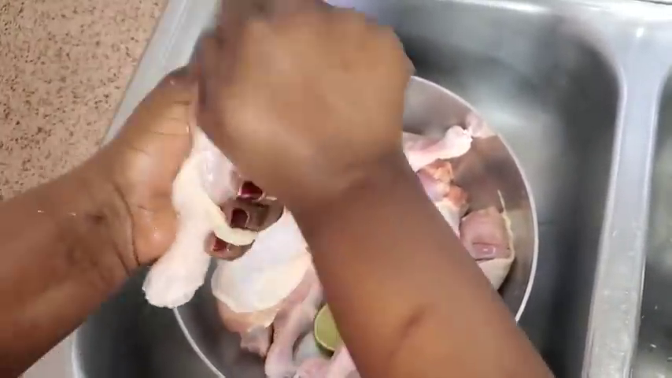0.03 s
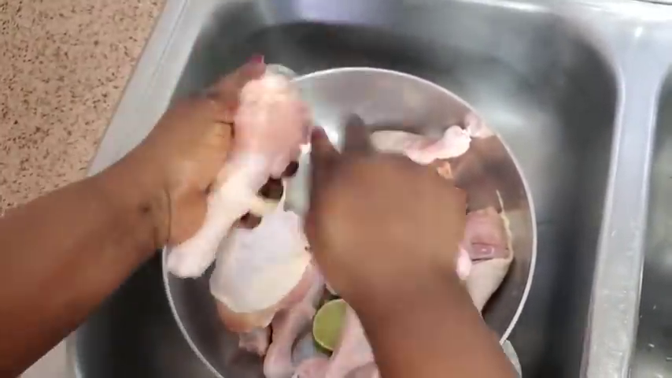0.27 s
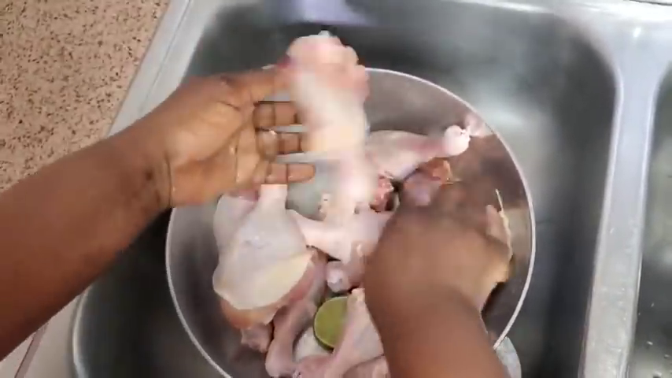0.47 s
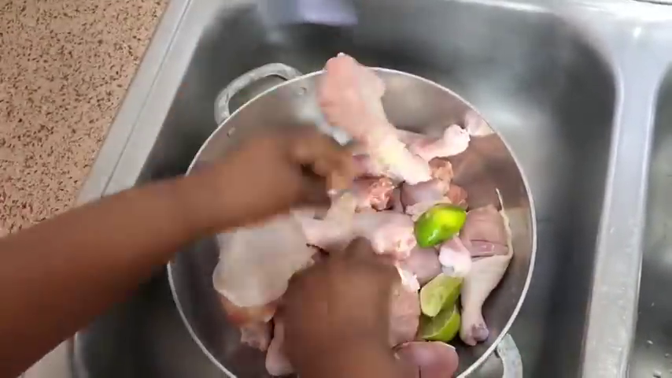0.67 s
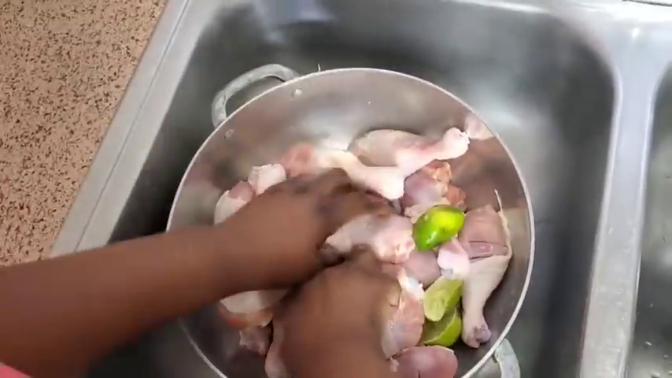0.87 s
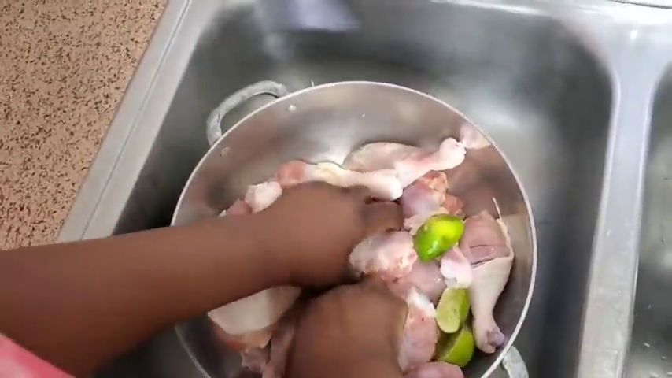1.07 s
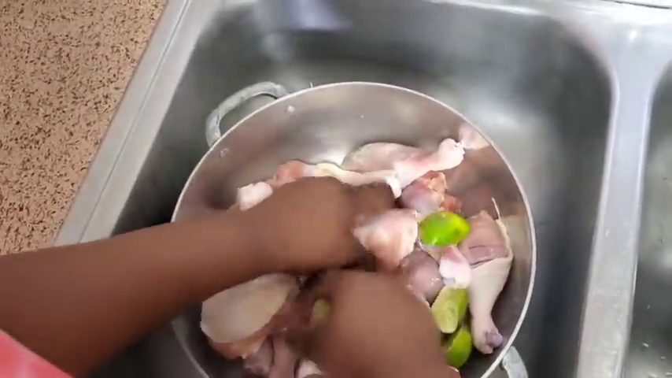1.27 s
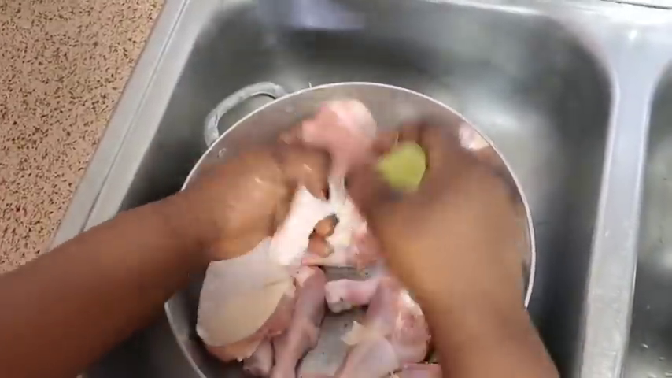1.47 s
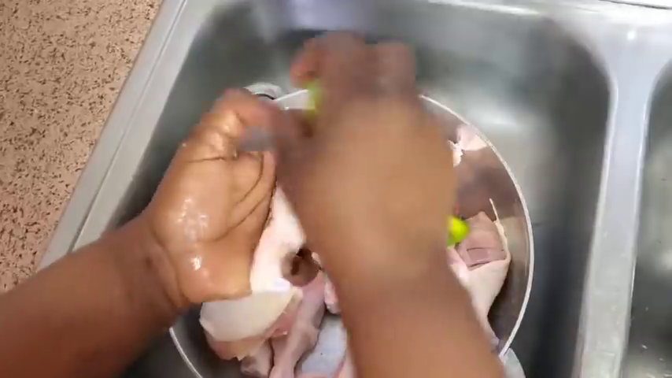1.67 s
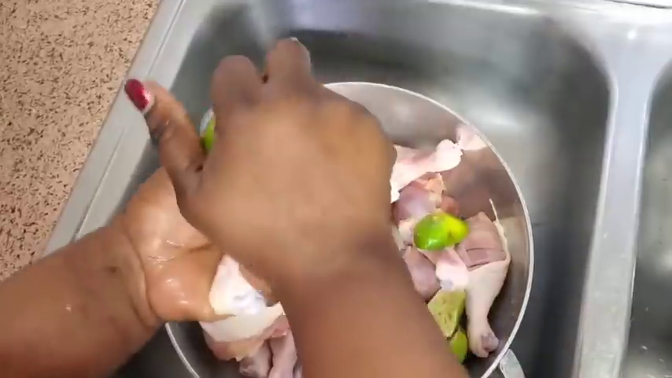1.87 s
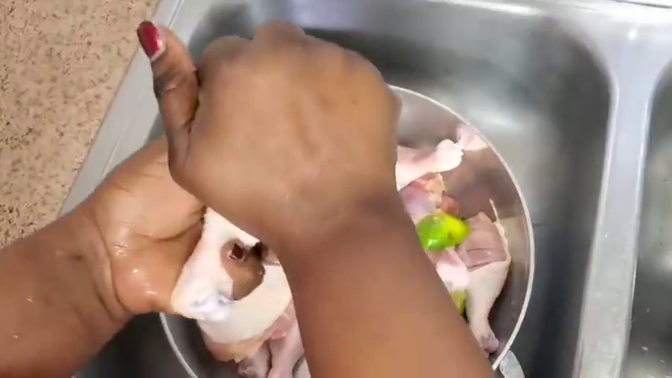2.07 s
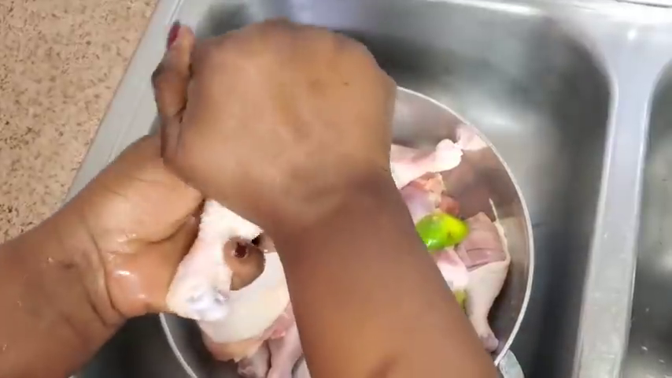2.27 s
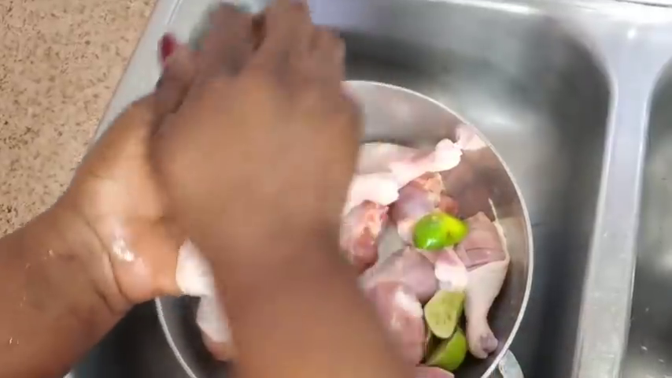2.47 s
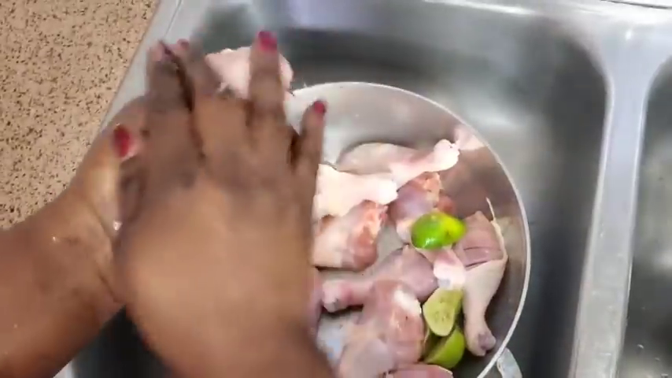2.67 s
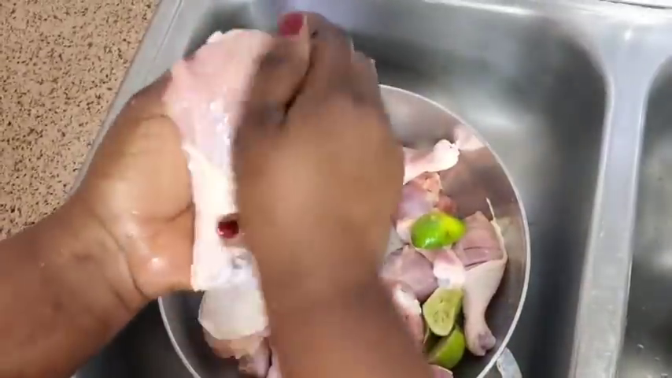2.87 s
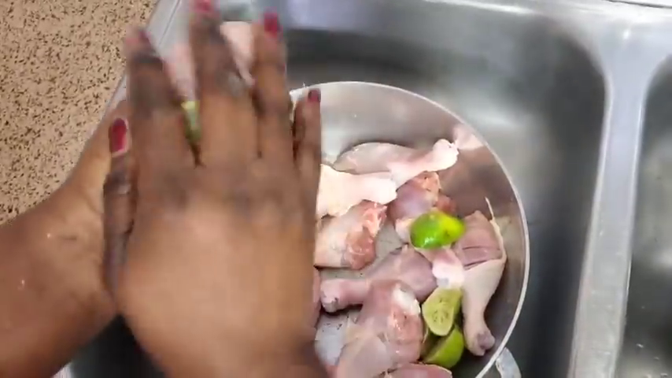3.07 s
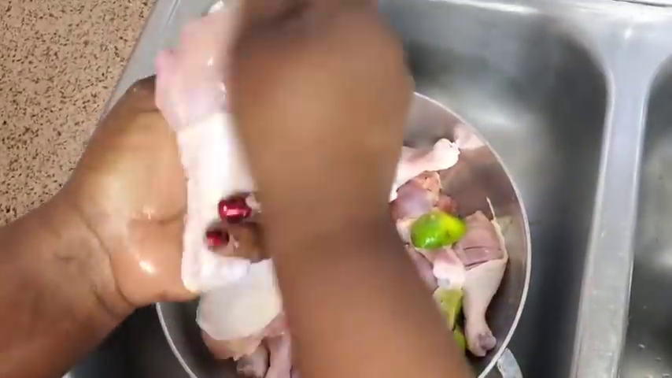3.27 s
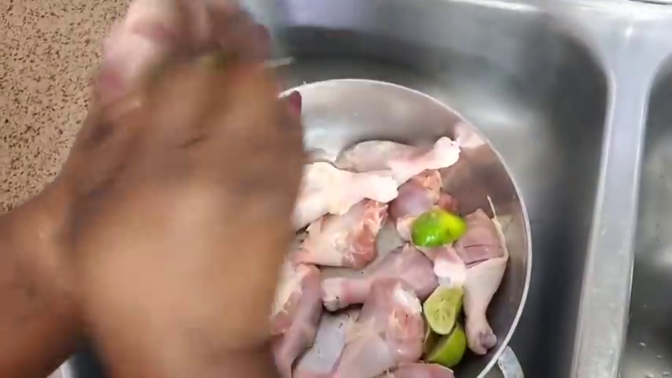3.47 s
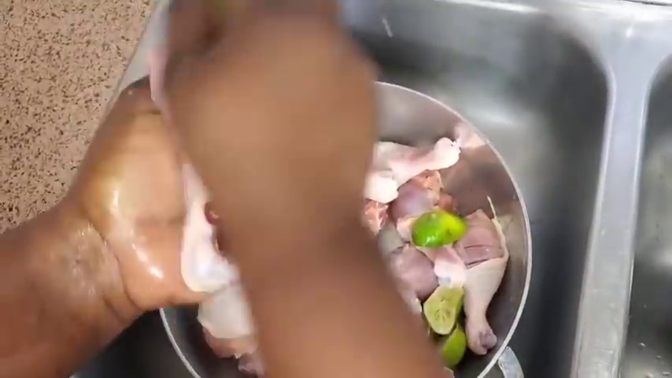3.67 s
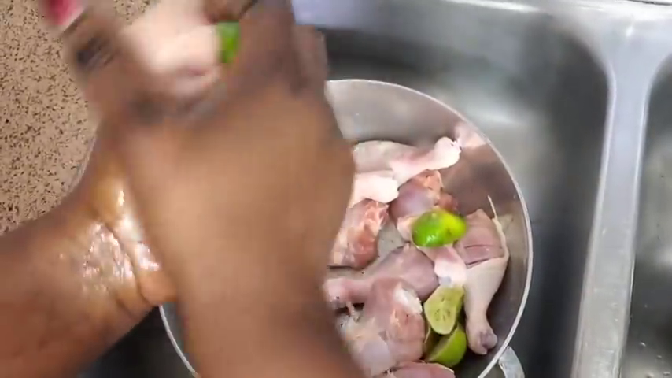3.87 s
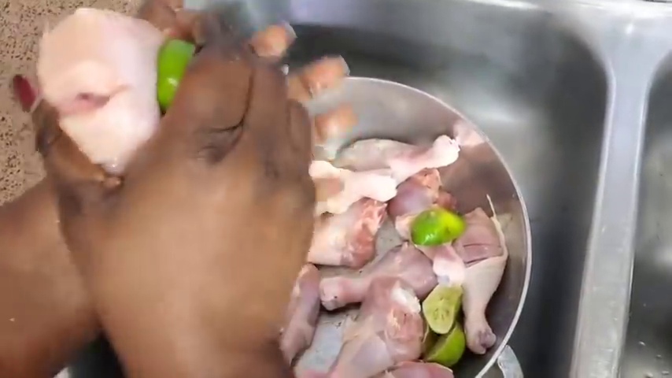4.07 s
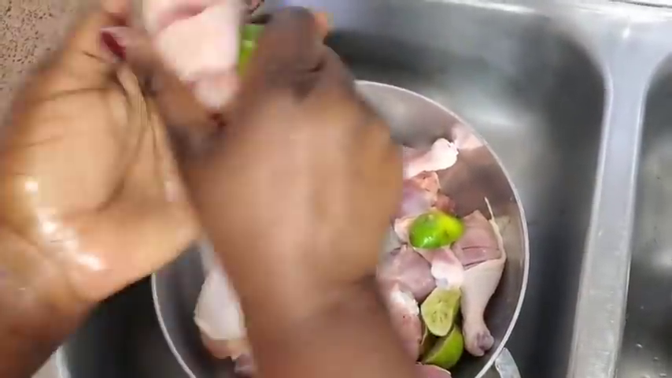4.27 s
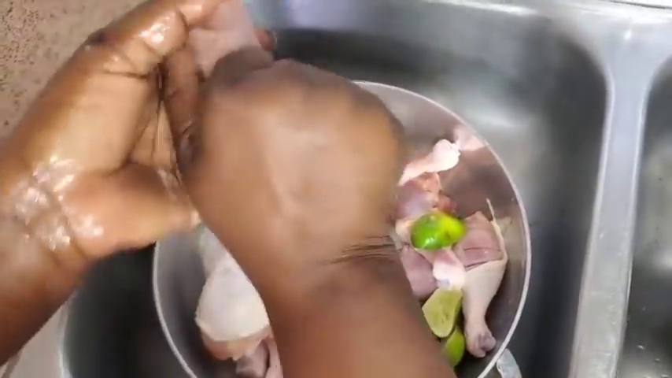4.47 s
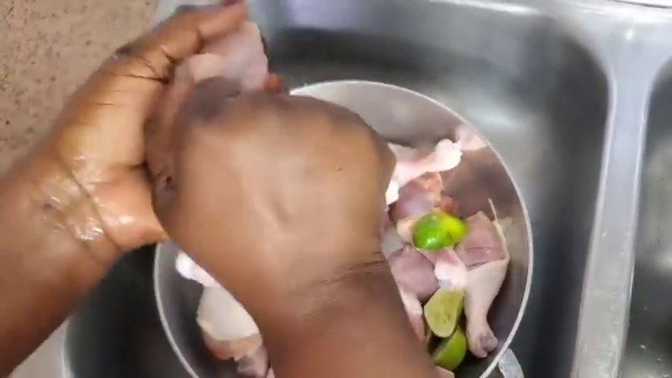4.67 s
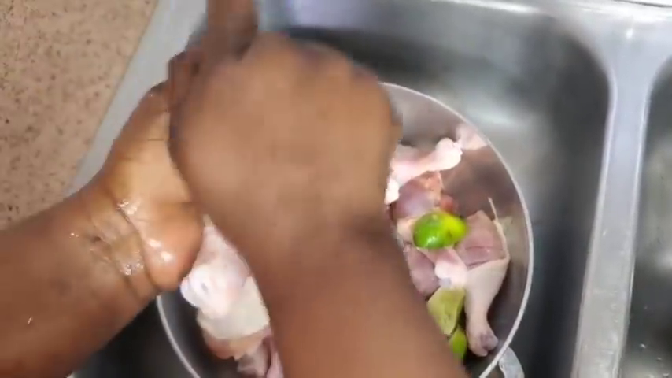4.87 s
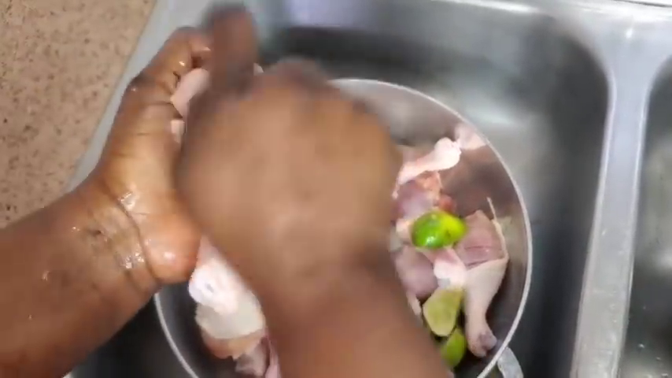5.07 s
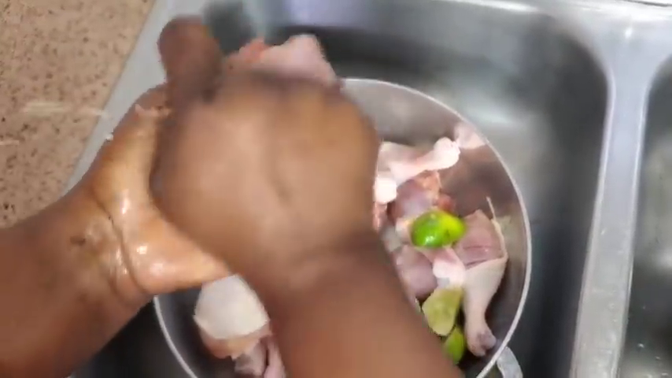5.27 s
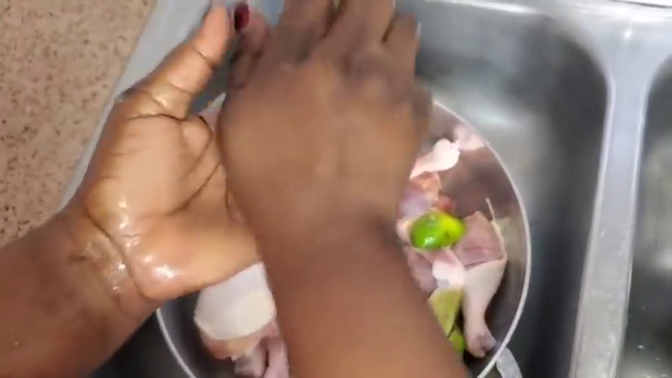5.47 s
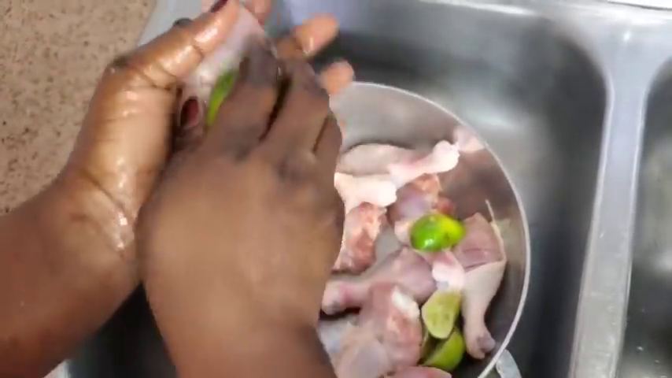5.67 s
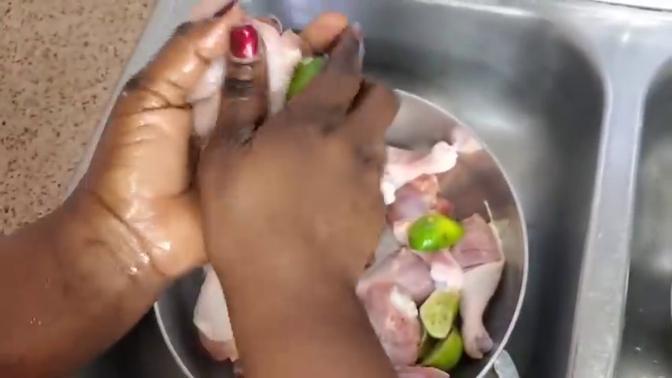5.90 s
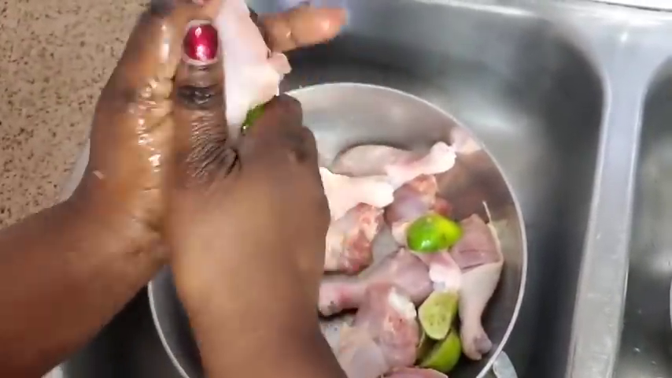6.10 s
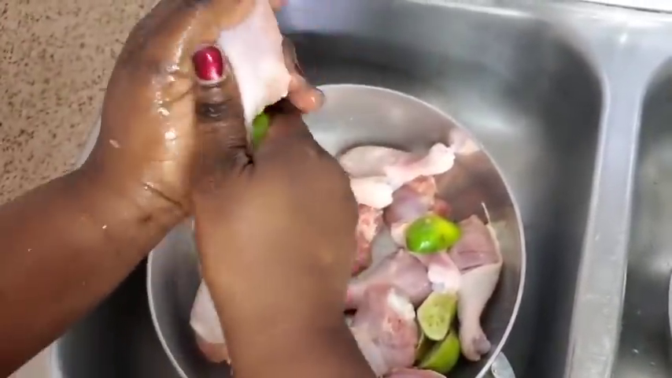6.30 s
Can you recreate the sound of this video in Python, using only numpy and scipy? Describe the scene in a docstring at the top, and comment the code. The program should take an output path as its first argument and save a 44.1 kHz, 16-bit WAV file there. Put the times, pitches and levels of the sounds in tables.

```python
"""Tiled kitchen, steel bowl in the sink: wet raw chicken is rubbed with a cut lime.
Squelches and spray are bursts of random clicks ringing drifting air pockets; suction pops are rising sine cycles.
A piece drops into the bowl and hands rummage in it: decaying modes, scrape noise, low push.
An appliance hums (tones plus narrow noise) over shaped noise for room air; random taps give the echoes."""
import sys
import numpy as np
from scipy import signal
from scipy.fft import rfft, irfft
from scipy.io import wavfile
from scipy.ndimage import uniform_filter1d

SR = 44100
rng = np.random.default_rng(int(sys.argv[2]) if len(sys.argv) > 2 else 0)


def to_wav(s):
    """Save 16-bit WAV."""
    ch = np.atleast_2d(s).T  # columns
    pcm = np.round(np.clip(ch, -1, 1) * 32767)  # PCM
    wavfile.write(sys.argv[1], SR, pcm.astype(np.int16))


N = 279499


def amp(db):
    """Amplitude ratio of a level in dB."""
    return 10 ** (np.asarray(db) / 20)


def evened(x):
    """Scales to unit RMS."""
    return x / np.sqrt(np.mean(x ** 2) + 1e-20)


def read(points, hz):
    """Interpolates a (f/Hz, value) table on a log frequency axis."""
    f, value = np.transpose(points)
    return np.interp(np.log(hz + 1), np.log(f + 1), value)


def curves(rows):
    """Every column at every sample, and a gate that fades to zero within 10 ms outside the table."""
    s, *columns = np.transpose(rows)
    t = np.arange(N) / SR
    inside_s = np.minimum(t - s[0], s[-1] - t)
    gate = np.clip(inside_s / .01 + 1, 0, 1)
    return [np.interp(t, s, c) for c in columns], gate


def panned(x, left_right_db):
    """Left and right channels, left louder by the given dB."""
    gains = np.array([amp(left_right_db / 2), amp(-left_right_db / 2)])
    return x * gains.reshape(2, -1)


def coloured(x, points):
    """Filters x by a (f/Hz, level/dB) table."""
    return irfft(rfft(x) * amp(read(points, np.fft.rfftfreq(N, 1 / SR))), N)


def resonate(x, hz, width_hz):
    """Resonance of gain 1 on a moving centre: shift hz to zero, smooth, shift back."""
    turn = np.exp(2j * np.pi * np.cumsum(hz * np.ones(N)) / SR)
    r = np.exp(-np.pi * abs(width_hz) / SR)
    smooth = signal.lfilter([1 - r], [1, -r], x / turn + 1e-18)
    return 2 * (turn * smooth).real


def twice(x, hz, width_hz):
    """Two equal resonances in series: steeper skirts."""
    return resonate(resonate(x, hz, width_hz), hz, width_hz)


def bursts(per_s, spread_db):
    """Random clicks of either sign, a few much larger than the rest."""
    size = amp(spread_db * np.minimum(rng.exponential(1, N), 4))
    hit = rng.random(N) < per_s / SR
    return evened(size * rng.standard_normal(N) * hit)


def gurgle(per_s, hz, width_hz, wobble):
    """Bubbles ring a pocket of changing size: one shared stream plus one of its own per channel."""
    streams = []
    for _ in range(3):
        size = 1 + wobble * evened(uniform_filter1d(rng.standard_normal(N), size=300))
        pocket_hz = hz * np.clip(size, .5, 2)
        streams.append(evened(twice(bursts(per_s, 3.8), pocket_hz, width_hz)))
    return evened(streams[0] + 2.3 * np.array(streams[1:]))


# room air spectrum: f/Hz, relative level/dB per Hz
AIR_SPECTRUM = [(14, -44), (28, 2), (65, -13), (163, -2), (210, -7), (262, -6.5), (347, -2.5), (459, -9),
                (558, -9), (759, -18.5), (2600, -24.5), (6010, -41.5), (11800, -46), (14700, -89),
                (16000, -68)]
AIR_DB = -37  # RMS of the air before the hum
# left-right likeness of the air: f/Hz, correlation (-1..1)
AIR_LIKENESS = [(60, 0.77), (180, 0.87), (550, 0.1), (1650, -0.052), (4970, -0.07), (15000, -1)]
# left-right balance of air and hum: f/Hz, left over right/dB
AIR_BALANCE = [(30, -9.5), (125, 2), (300, -4.5), (1000, 4.5), (8000, -3.5)]
# appliance tones: f/Hz, width/Hz per resonance, level/dB, pure-tone share of power (0..1)
HUM_TONES = [(58.2, 12, -41, 0.42), (77.1, 14, -41.5, 0.75), (121.8, 2.9, -44.5, 0.16),
             (170.6, 3, -60, 0.077), (208.5, 10.2, -46, 1), (235.2, 5.7, -51, 0.11),
             (295.6, 9.2, -49, 0.27), (351, 12.3, -38.5, 0.96), (417.6, 7.2, -51, 0.82),
             (516.4, 7.7, -55, 0.5)]


def room_air():
    """Spectrally shaped noise whose channels are alike in the bass, unlike or opposed higher up."""
    frames, hz = N // 512 + 5, np.fft.rfftfreq(2048, 1 / SR)
    a, b, c, d = rng.standard_normal((frames, 1025, 4)).T
    same = np.clip(read(AIR_LIKENESS, hz), -1, 1)[:, None]
    left = a + 1j * b
    right = same * left + np.sqrt(1 - same ** 2) * (c + 1j * d)
    gain = panned(amp(read(AIR_SPECTRUM, hz)), read(AIR_BALANCE, hz))
    z = np.array([left, right]) * gain[:, :, None]
    return amp(AIR_DB) * evened(signal.istft(z, nperseg=2048, noverlap=1536)[1][:, :N])


def appliance():
    """Hum: each tone is a steady sine plus narrow noise that makes it waver."""
    out, t = np.zeros((2, N)), np.arange(N) / SR
    for f, width_hz, db, pure in HUM_TONES:
        pure = np.clip(pure, 0, 1)
        fuzz = evened(twice(rng.standard_normal(N), f, width_hz))
        sine = np.sin(2 * np.pi * (f * t + rng.random()))
        tone = np.sqrt(2 * pure) * sine + np.sqrt(1 - pure) * fuzz
        out += panned(amp(db) * tone, read(AIR_BALANCE, f))
    return out


# decay of the tiled room: f/Hz, t60/s
ROOM_DECAY = [(200, 0.33), (2500, 0.33), (6000, 0.23), (14000, 0.2)]


def room(x):
    """Sparse random-sign taps, different per channel: quick echoes off the sink, then the tiles."""
    taps = np.zeros((2, SR // 2))
    grid = np.arange(100, SR // 2 - 20, 20)
    at = grid + rng.integers(0, 20, (2, (SR // 2 - 101) // 20))
    np.put_along_axis(taps, at, rng.choice([-1., 1.], at.shape), 1)
    hz, t, z = signal.stft(taps, SR, nperseg=256)
    sink = amp(-60 * t / 0.046)  # t60 46 ms
    tiles = amp(-10.5 - 60 * t / np.maximum(read(ROOM_DECAY, hz), .02)[:, None])
    tail = signal.istft(z * (sink + tiles), SR, nperseg=256)[1]
    return signal.fftconvolve(x, tail / np.linalg.norm(tail[0]), axes=1)[:, :N]


# modes of bowl and sink: f/Hz, relative level/dB, t60/s
BOWL_MODES = [(77.9, 4.5, 0.33), (139, -3, 0.11), (201.2, 2.5, 0.18), (283.5, 5.5, 0.072),
              (413.6, 3.5, 0.12), (468, 8, 0.097), (575, 6.5, 0.068), (642, 2, 0.087), (686, -4, 0.16),
              (777, -3.5, 0.08), (887, -16, 0.28), (1050, -14, 0.14), (1246, -2, 0.024), (1426, -8.5, 0.17),
              (2360, -20, 0.13)]
# meat landing in the bowl: t/s, relative level/dB, f/Hz of the modes rung most
MEAT_BLOWS = [(.447, -31, 537), (0.57, -15.5, 90.6), (.5942, -7, 556), (.613, -10.5, 570), (0.619, 3, 112),
              (.623, -15.5, 454), (0.644, -16, 91), (.646, -20, 744), (.688, -19, 418), (.715, -16.5, 384),
              (.72, -12, 2450), (0.798, -22.5, 1310), (0.891, -21, 287), (.92, -31.5, 590),
              (1.02, -26, 561.4), (4.051, -26, 250), (5.155, -22, 1190)]
# pieces shoved about: t/s, relative ring level/dB, scrape level/dB, low push level/dB
BOWL_SHOVES = [(.38, -82, -64, -50), (.492, -74, -62, -33), (.56, -87, -84, -39), (.594, -85, -29.5, -36),
               (.622, -47, -32.5, -13.5), (.646, -55, -31, -36), (.79, -61, -54, -25),
               (.802, -63, -29, -27), (1.112, -69.5, -37.5, -40.5), (1.252, -83, -78, -48)]


def bowl():
    """Blows ring the modes near their own pitch; shoving rattles ten modes, scrapes and pushes the sink."""
    t = np.arange(SR // 2) / SR
    hz, db, t60_s = np.transpose(BOWL_MODES)[:, :, None]
    decay = amp(db - 60 * t / np.maximum(t60_s, .01))
    modes = decay * np.sin(2 * np.pi * hz * t) * np.minimum(t / 0.0016, 1)  # 1.6 ms attack
    rung = np.zeros((len(BOWL_MODES), N + len(t)))
    for s, blow_db, near_hz in MEAT_BLOWS:
        octaves = np.log2(hz / near_hz)
        share = amp(np.maximum(-110 * octaves ** 2, -24))
        rung[:, round(s * SR):][:, :len(t)] += amp(blow_db) * share * modes
    (ring_db, scrape_db, push_db), on = curves(BOWL_SHOVES)
    for k in range(1, 11):
        rattle = amp(ring_db) * on * bursts(550, 1.1)
        rung[k, :N] += signal.oaconvolve(rattle, modes[k])[:N]
    sink, pan = rung[:3, :N].sum(0), rung[3:, :N].sum(0)
    scrape = amp(scrape_db) * on * gurgle(2800, 1270, 760, wobble=0.065)
    push = amp(push_db) * on * evened(twice(rng.standard_normal(N), 41.3, 75))
    return panned(pan, 4.2) + panned(scrape, -2.8) + panned(sink + push, -0.58)


# suction pops between wet skin and rind: t/s, strength level/dB, pocket f/Hz, left over right/dB
SUCTION_POPS = [(.0737, -37, 11400, -15), (0.3084, -33, 11200, -19), (.3406, -27, 11500, -7),
                (0.3547, -27, 4600, 2), (0.3544, -24, 10900, -5), (0.4537, -27.5, 2910, -7),
                (0.595, -13.5, 2110, -9), (0.7213, -22, 2380, -24), (0.8127, -11.5, 2910, -13),
                (.8127, -7, 4490, 3), (0.8675, -17.5, 8500, -9), (1.1049, -18, 9300, -10),
                (1.2725, -33, 3140, 0), (1.3743, -33, 8500, -21), (1.3806, -25.5, 2440, -5),
                (1.6023, -36, 11500, -13), (1.777, -35, 4430, -3), (2.2204, -18.5, 2400, -18),
                (2.7087, -31, 2000, -6), (2.748, -29, 9500, -25), (2.7796, -32, 8100, -22),
                (2.8384, -10.5, 8950, -13), (2.8529, -20, 4450, -5), (3.0076, -16, 2850, -8.5),
                (3.035, -15.5, 3430, -1.5), (3.1078, -23, 11200, -15), (3.267, -21.5, 9000, -11),
                (3.3827, -28, 12600, -11), (3.394, -27, 10300, -14), (3.406, -21, 11360, -3),
                (3.413, -40, 11000, -4), (3.5312, -16.5, 2790, -4.5), (3.713, -25.5, 4430, -4),
                (4.0522, -24.5, 2500, -1), (4.2316, -25.5, 9600, -12), (4.3172, -29.5, 5100, -8),
                (4.3444, -29, 2200, 3), (4.376, -31, 4440, 2), (4.4523, -27.5, 2445, -10),
                (4.4513, -30, 8600, -13), (4.56, -24, 2030, -7), (4.863, -26, 8900, -11),
                (4.863, -30, 2500, -9), (4.9317, -30, 7850, -12), (4.9414, -32.5, 2470, -12),
                (5.0629, -30, 11500, -15), (5.1562, -16, 2680, 3), (5.1582, -28, 10600, -3),
                (5.1776, -3.5, 11300, -3), (5.223, -16.5, 5470, -8), (5.334, -13.5, 5450, -4),
                (5.5196, -25.5, 12300, -11), (5.5593, -29, 11400, -13), (5.5897, -21, 13900, -2),
                (5.9606, -29, 2750, -24.5), (6.022, -33, 10800, -15)]


def pops():
    """Each pocket snaps open: a few cycles that swell, glide up and die, over a broad tick."""
    out, t = np.zeros((2, N + 1000)), np.arange(1000) / SR
    ticks = rng.standard_normal((len(SUCTION_POPS), 1000))
    for (s, db, hz, pan_db), tick in zip(SUCTION_POPS, ticks):
        cycles = t * hz
        envelope = (1 - np.exp(-cycles / 0.35)) * np.exp(-cycles / 3.37)
        ring = envelope * np.sin(2 * np.pi * cycles * (1 + 8 * t))
        snap = ring + 0.073 * tick * np.exp(-cycles / 6.1)
        out[:, round(s * SR):][:, :1000] += panned(amp(db) * snap, pan_db)
    return out[:, :N]


# squelches of lime on skin: peak t/s, swell/s, fade/s, palm pocket level/dB, palm pocket f/Hz,
# finger gaps level/dB, finger gaps f/Hz, fine spray relative level/dB
LIME_SQUELCHES = [(.16, 0.31, 0.35, -56, 2160, -60.5, 4310, -59.5),
                  (.356, 0.044, 0.069, -47, 2770, -48, 4560, -41.5),
                  (.46, .1, 0.053, -50, 2340, -82, 3500, -78),
                  (0.598, 0.021, 0.075, -32.5, 2170, -44.5, 3800, -46),
                  (0.721, 0.0059, 0.046, -29, 2420, -48, 3600, -71),
                  (0.815, 0.0056, 0.075, -27, 2400, -28, 3800, -46),
                  (.9, 0.23, 0.22, -39, 2500, -44.5, 4070, -52),
                  (1.128, 0.43, 0.023, -42, 2330, -50, 3860, -46),
                  (1.27, 0.025, 0.21, -49, 2460, -60.5, 3600, -52),
                  (1.43, 0.12, 0.055, -51, 2460, -53.5, 4170, -56),
                  (1.605, 0.011, 0.065, -79, 2400, -61, 4000, -56),
                  (1.782, .006, 0.072, -56, 2333, -66, 4300, -51.5),
                  (1.855, .01, 0.079, -70, 2370, -86, 4070, -63.5),
                  (2.129, 0.14, 0.029, -43.5, 1870, -56.5, 4100, -50),
                  (2.235, 0.024, 0.069, -23, 2420, -45.5, 3900, -56),
                  (2.257, 0.03, 0.088, -33, 2560, -21, 3790, -29),
                  (2.35, 0.09, 0.36, -46.5, 2470, -49.5, 4220, -46.5),
                  (2.794, 0.05, 0.27, -49, 2320, -46.5, 4090, -43.5),
                  (2.842, 0.0072, 0.11, -81, 2315, -60.5, 4400, -52.5),
                  (2.861, 0.027, 0.094, -34, 2300, -34, 4500, -40.5),
                  (3.01, 0.036, 0.098, -49, 2680, -41, 3900, -43),
                  (3.035, .005, 0.076, -39, 2820, -40.5, 3890, -46),
                  (3.11, .03, 0.051, -52, 2880, -48, 3680, -53),
                  (3.282, 0.11, 0.14, -41.5, 2080, -46.5, 4400, -44),
                  (3.41, 0.035, 0.22, -46, 2220, -52.5, 4380, -47.5),
                  (3.535, 0.0087, 0.055, -46, 2770, -50, 3460, -51),
                  (3.72, 0.1, 0.1, -47.5, 2230, -49, 4170, -51.5),
                  (3.99, 0.19, 0.12, -55, 2120, -59, 4470, -55.5),
                  (4.36, 0.51, .1, -55, 2240, -65, 4900, -57.5),
                  (4.46, 0.016, 0.062, -36, 2200, -52.5, 4700, -54),
                  (4.59, 0.051, 0.26, -43, 2070, -81.5, 4495, -68.5),
                  (4.639, 0.059, 0.088, -35.5, 2220, -38.5, 3770, -49),
                  (4.99, 0.054, 0.2, -49.5, 2080, -58, 4500, -52),
                  (5.08, 0.39, 0.2, -52, 2680, -58, 3570, -53.5),
                  (5.159, 0.0079, 0.11, -35, 1690, -39, 3400, -37.5),
                  (5.183, 0.034, 0.11, -30.5, 2500, -37.5, 5330, -32.5),
                  (5.336, .006, 0.095, -48, 1980, -43.5, 4400, -49),
                  (5.45, 0.48, 0.25, -54, 2630, -59, 4130, -54),
                  (5.61, 0.32, 0.15, -48, 2550, -56, 4000, -53),
                  (5.964, .006, 0.06, -39, 2520, -76, 3500, -56),
                  (6.05, 0.071, 1, -55, 2670, -61.5, 4280, -54)]
SPAN_DB = 20  # change of level over the swell or fade time
REST_DB = -62.5  # relative level of faint spray from wet hands at rest


def squelching():
    """Layer levels and pocket pitches: squelch powers add, the loudest dominates the pitch."""
    t = np.arange(0, N / SR + .002, .001)
    columns = np.transpose(LIME_SQUELCHES)[:, :, None]
    s, swell_s, fade_s, palm_db, palm_hz, gaps_db, gaps_hz, spray_db = columns
    rising, falling = (s - t) / np.maximum(swell_s, .005), (t - s) / np.maximum(fade_s, .005)
    shape_db = np.maximum(-SPAN_DB * np.maximum(rising, falling), -200)
    power = [amp(db + shape_db) ** 2 for db in (palm_db, gaps_db, spray_db)]
    pitch = [(p * hz).sum(0) / p.sum(0) for p, hz in zip(power, (palm_hz, gaps_hz))]
    level = [np.sqrt(p.sum(0)) for p in power]
    level[2] = np.hypot(level[2], amp(REST_DB))
    return [np.interp(np.arange(N) / SR, t, c) for c in level + pitch]


TACKS_PER_S, TACK_S, TACK_SHARE = 35, .025, .4


def tacky():
    """Sticky skin lets go in small tugs: the gain jumps at each and sinks until the next."""
    tugs = rng.random(N) * (rng.random(N) < TACKS_PER_S / SR)
    tugs = signal.lfilter([1], [1, -np.exp(-1 / (TACK_S * SR))], tugs)
    return evened(1 - TACK_SHARE + TACK_SHARE * evened(tugs))


# a finger slips: t/s, level/dB, f/Hz
FINGER_SQUEAK = [(5.42, -48.5, 2530), (5.45, -47, 2760), (5.51, -54, 3066), (5.535, -57, 3000)]


def squeak():
    """A slipping finger: noise through a narrow gliding resonance."""
    (slip_db, slip_hz), on = curves(FINGER_SQUEAK)
    return amp(slip_db) * on * evened(resonate(rng.standard_normal(N), slip_hz, 25))


# spray spectrum: f/Hz, relative level/dB per Hz
SPRAY_SPECTRUM = [(4000, -57), (6000, -13), (7200, -16.5), (8600, -4.5), (10000, -7.5), (11600, 0),
                  (12600, -0.5), (14000, -4), (16000, -9)]
# spray balance: f/Hz, left over right/dB
SPRAY_BALANCE = [(5000, -17), (8500, -22), (13000, -5.5)]
HANDS_LEFT_RIGHT_DB = -4
FLOOD_DB = -40  # gap level about which juice takes over from sticking


def rubbing():
    """Bursting bubbles ring air under the palm and between fingers; the finest hiss as spray."""
    palm, gaps, spray, palm_hz, gaps_hz = squelching()
    wet = gaps / (gaps + amp(FLOOD_DB))
    tack = wet + (1 - wet) * tacky()
    palm = palm * gurgle(900, palm_hz, 650, wobble=.06)
    narrow = gurgle(1500, gaps_hz, 800, wobble=.05)
    broad = gurgle(1500, gaps_hz, 1800, wobble=0.22)
    gaps = gaps * tack * (narrow + 1.06 * broad)
    shared, *own_drops = [bursts(5000, 2.8) for _ in range(3)]
    hiss = np.array([coloured(shared + 1.6 * own, SPRAY_SPECTRUM) for own in own_drops])
    spray = spray * tack * evened(hiss)
    # hard squirts spray finer
    fine = np.array([resonate(side, 13000, 3500) for side in spray])
    spray = spray + 1.54 * wet ** 2 * fine
    balance_db = read(SPRAY_BALANCE, np.fft.rfftfreq(N, 1 / SR))
    spray = irfft(rfft(spray) * panned(0.84, balance_db), N)
    return panned(palm + gaps + squeak(), HANDS_LEFT_RIGHT_DB) + spray


def scene():
    """Air and hum, room echoes, bowl, and the hands close by."""
    rub, pop, pot = rubbing(), pops(), bowl()
    near = amp(1.5) * rub + pop
    near[1] = np.roll(near[1], 8)  # hands reach the left 8 samples sooner
    echoed = amp(-1.5) * rub + pop + amp(-10) * pot
    return near + pot + room(echoed) + room_air() + appliance()


EDGE_HZ, RECOVERY_DB_PER_S, THRESHOLD_DB = 15700, 1.14, -12


def record(dry):
    """Gain control dips after loud sounds and creeps back; soft ceiling; low-pass band limit."""
    power_db = 10 * np.log10(abs(uniform_filter1d((dry ** 2).mean(0), 800)) + 1e-12)
    fall_db = np.arange(N) * RECOVERY_DB_PER_S / SR
    held_db = np.maximum.accumulate(power_db + fall_db) - fall_db
    over_db = np.maximum(held_db - THRESHOLD_DB, 0)
    dip_db = 0.9 * uniform_filter1d(over_db, 4000, origin=1900)  # smoothed, lagging
    ducked = np.tanh(dry / amp(dip_db))
    low_pass = signal.firwin(511, EDGE_HZ, window=("kaiser", 9), fs=SR)
    return signal.oaconvolve(ducked, low_pass[None], "same")


dry = scene()
out = record(dry)
to_wav(out)
```